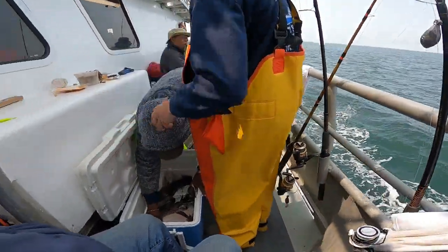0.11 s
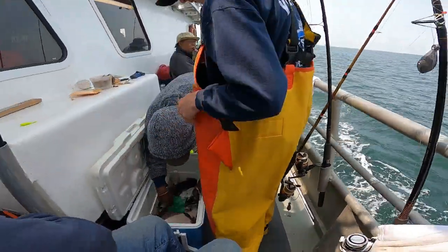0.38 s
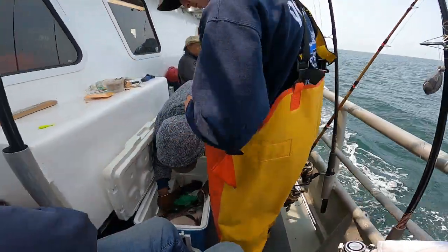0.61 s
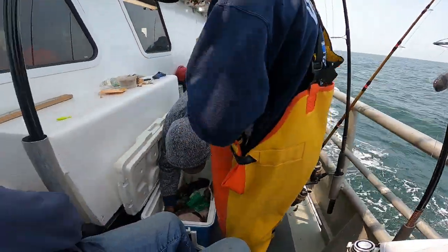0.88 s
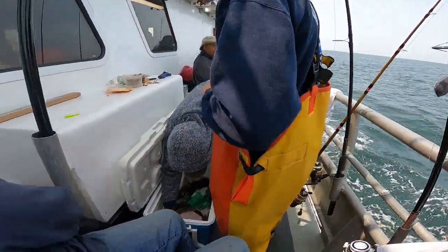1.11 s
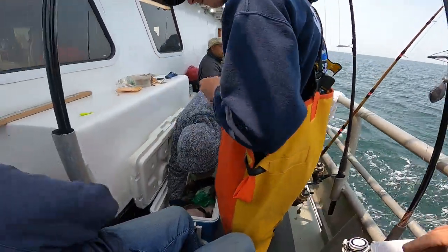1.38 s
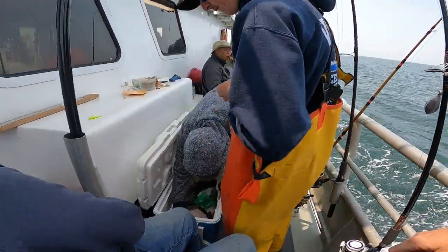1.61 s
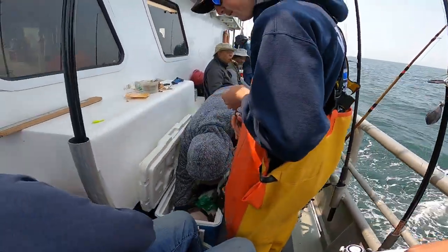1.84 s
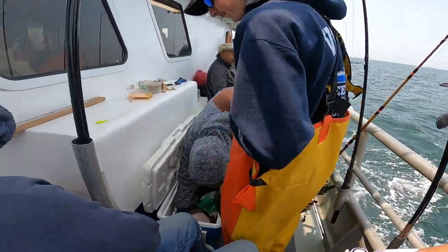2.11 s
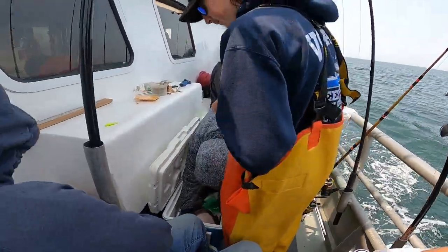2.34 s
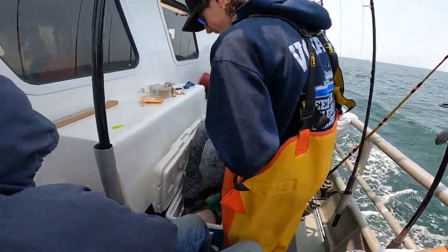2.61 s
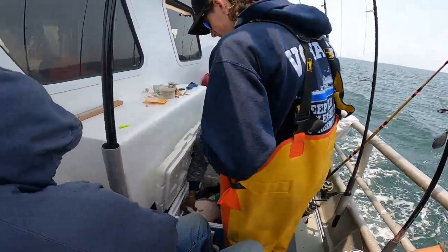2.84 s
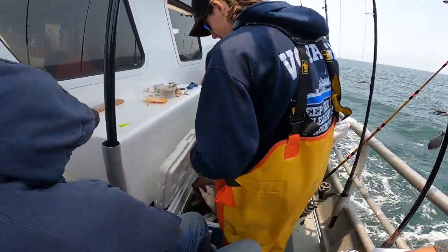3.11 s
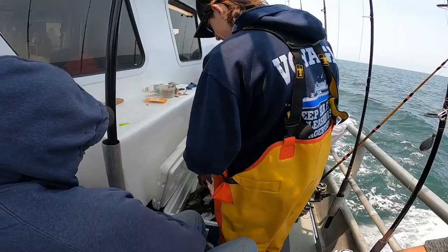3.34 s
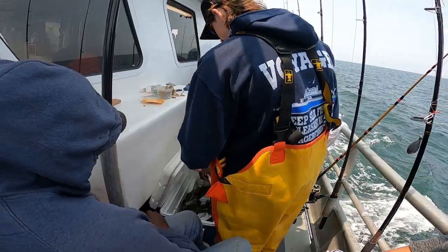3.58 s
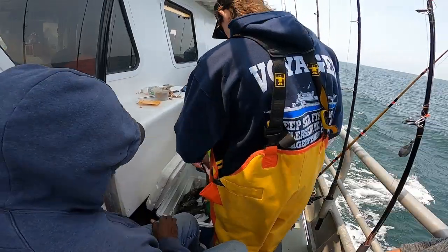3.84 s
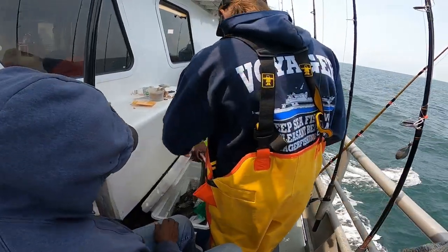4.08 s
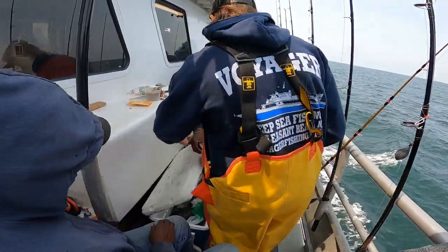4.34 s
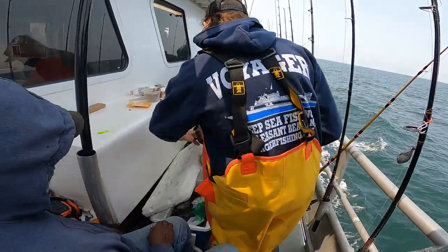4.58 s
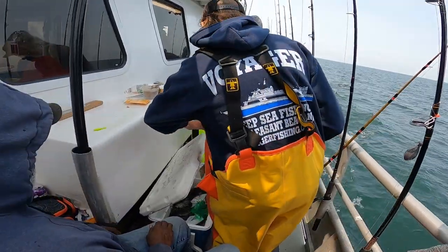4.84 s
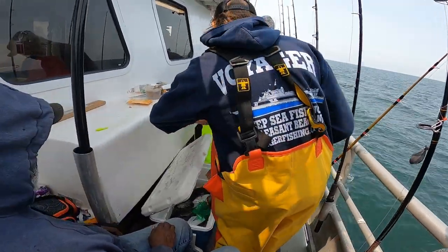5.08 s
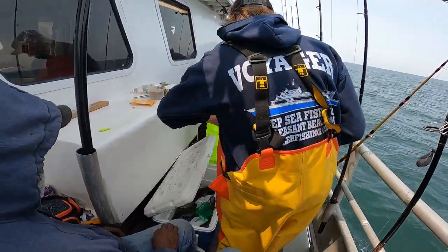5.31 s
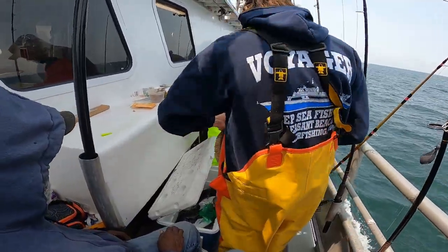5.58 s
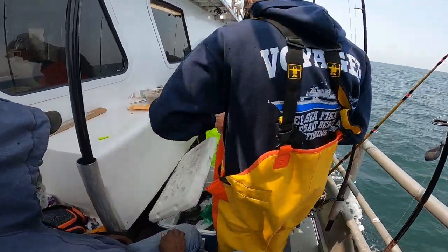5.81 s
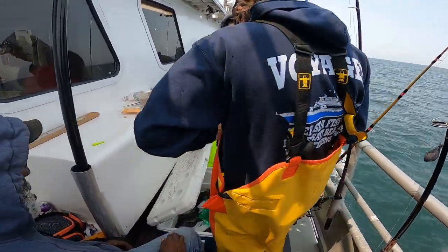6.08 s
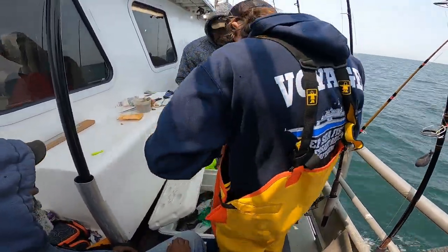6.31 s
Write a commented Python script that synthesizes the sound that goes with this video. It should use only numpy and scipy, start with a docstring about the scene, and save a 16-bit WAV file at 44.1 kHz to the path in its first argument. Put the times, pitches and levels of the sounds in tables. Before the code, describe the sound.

On the open deck of a moving boat, a deep diesel drone with a broad hull roar dominates. It holds steady for two seconds, then rises a few semitones and roughens, louder near the end. Wind buffets a small stereo camera microphone unevenly left and right. Wake hisses in soft swells. Faint metal clinks, a short cloth rustle and dull box knocks come mid-way, with another knock at the very end.

```python
"""Diesel under a boat's deck

On deck, above a six-cylinder diesel that gains speed: a deep firing tone and weaker crank orders are sines,
the exhaust's bark is a looped pulse, and a neighbouring tone and a second machine's hum are more sines.
Filtered noise makes the hull's roar, the wind on the microphone, the hissing wake and the rustling oilskin.
Near a small camera's two ports, tackle clinks and knocks as decaying modes; a whistle scrapes upward.
"""
import sys
import numpy as np
from scipy import signal
from scipy.fft import rfft, irfft, next_fast_len
from scipy.io import wavfile
from scipy.ndimage import uniform_filter1d, map_coordinates

SR = 44100
rng = np.random.default_rng(int(sys.argv[2]) if len(sys.argv) > 2 else 0)


def amplitude_ratio(level_db):
    """Convert a level in decibels to the matching linear amplitude (field) ratio."""
    exponent = np.asarray(level_db, float) / 20
    return 10 ** exponent


def wav_record(signal):
    """Record a signal, one row per channel, as 16-bit PCM in the file named by sys.argv[1]."""
    frames = np.transpose(np.atleast_2d(signal))
    bounded = np.clip(frames, -1, 1)
    # unit amplitude maps onto the largest positive 16-bit level
    quanta = np.round(bounded * 32767).astype(np.int16)
    wavfile.write(sys.argv[1], SR, quanta)


N = 284004
TIME = np.arange(N) / SR  # s

# Firing rate of the diesel: (time [s], rate [Hz])
FIRING_RATE = [(0, 46.4), (2.1, 46.6), (2.62, 50.8), (3.0, 51.6), (3.3, 52.75), (4.1, 54.7), (4.45, 57.1),
               (4.8, 57.4), (5.1, 58.1), (6.44, 58.6)]
# How loud the deck carries the firing tone at each pitch: (frequency [Hz], level [dB])
FIRING_TONE = [(46.4, -17), (49, -17), (53.5, -16), (55, -19), (57, -22), (58.5, -21.5)]
# The same for the tone at 1.5 times the firing rate: (frequency [Hz], level [dB])
UPPER_TONE = [(69.7, -25.5), (73, -29), (78, -33), (82, -34), (85.5, -28.5), (87.4, -27), (87.75, -26),
              (87.9, -20.5)]
# Weaker crank orders: (order [sixths of the firing rate], level at low speed [dB], level at full speed [dB])
WEAK_ORDERS = [(12, -46, -36), (18, -48, -42), (21, -55, -42), (24, -47, -42), (26, -46, -56),
               (27, -54, -42), (30, -43, -43), (33, -56, -47), (34, -50, -56), (37, -56, -45),
               (38, -47, -56), (39, -52, -46), (40, -46, -56), (43, -56, -49), (44, -47, -54),
               (45, -47, -54), (48, -56, -47), (54, -50, -55), (57, -57, -50), (60, -52, -50)]
# Overtones of the exhaust pulses, relative: (multiple of half the firing rate [1], level [dB])
BARK = [(14, -58), (22, -56), (30, -63), (38, -62), (56, -65), (64, -72)]
# Neighbouring tone, perhaps a twin engine: (time [s], frequency [Hz])
TWIN_RATE = [(0, 53.8), (4.3, 54), (5.4, 54.2), (5.5, 55.3), (6.44, 55.6)]
# Lines of a second machine that keeps its speed: (frequency [Hz], level [dB])
HUM_LINES = [(40, -35), (80.2, -33), (120.3, -46), (161.6, -43), (321.5, -45), (484, -48)]
# Hull roar over time; the wake follows it: (time [s], level [dB])
ROAR_LEVEL = [(0, -25), (1.1, -26), (1.9, -27), (2.6, -26.5), (3.6, -27.5), (4.05, -27.5), (4.55, -23.5),
              (5.2, -24), (5.9, -21.5), (6.44, -22)]
# Colour of the roar before the panels, relative: (frequency [Hz], density [dB per Hz])
ROAR_COLOUR = [(25, 0), (42, -7), (60, 3), (90, 1), (130, -1), (196, -3.5), (242, -4), (400, -11.5),
               (580, -10), (740, -13.5), (1000, -13), (1250, -16), (1500, -16.5), (2000, -18), (2200, -20),
               (2500, -22), (2890, -25), (3830, -32.5), (5000, -36), (7000, -46.5), (10000, -80)]
# Hull panels rung by the roar:
# (frequency [Hz], width [Hz], strength at low speed [dB], strength at full speed [dB])
HULL_PANELS = [(240, 34, 1, 2), (325.4, 37, -1, 4), (479, 60, 4.5, -2), (665, 36, 1, -7.5), (910, 40, 2, 6),
               (1003, 80, 3.5, -4), (1144, 64, 6, 3.5), (1274, 60, 2.5, -3.5), (1742, 257, 2, 2),
               (2500, 130, 1.5, -2), (3230, 250, -9.5, 0.5), (3860, 140, 7, 6.5), (3980, 140, 4, 6)]
# Further change of the roar's colour from slow to fast: (frequency [Hz], change [dB])
FULL_SPEED_COLOUR = [(100, 0), (250, 0), (550, -1), (1050, -1), (1700, 1), (3000, 0), (5000, -0.5)]
# Likeness of left and right in roar, wake and cloth: (frequency [Hz], coherence [1])
LIKENESS = [(60, 0.89), (190, 0.96), (350, 1), (600, 0.89), (1070, 0.87), (2400, 0.88), (3400, 0.75),
            (4500, 0.67), (6000, 0.41), (8000, .2), (11000, 0.095)]
# Wind on the ports: (time [s], strength [dB], left minus right [dB])
GUSTS = [(0, -37, 2), (.1, -51, 1.5), (.4, -52.5, -1), (.5, -23.5, 17), (.62, -39.5, 3), (.8, -28.5, -3),
         (.95, -31, 3), (1.1, -34.5, 9), (1.22, -25, 4), (1.45, -26.5, 3), (1.6, -25, -7.5), (1.8, -27, 3),
         (1.87, -18, 1.5), (1.95, -29, 3.5), (2.15, -22.5, -6), (2.42, -25.5, 3), (2.55, -33.5, 9.5),
         (2.72, -31, 0.5), (3.05, -24, -4.5), (3.2, -18.5, -5), (3.4, -36, 1), (3.55, -27, 8),
         (3.7, -27, 3), (3.82, -31.5, -4), (3.9, -32, -10), (4.15, -30.5, -5), (4.3, -21.5, -2.5),
         (4.55, -21, -8), (4.7, -23, -3), (5.1, -25, -6.5), (5.25, -27.5, -3), (5.4, -24.5, 3.5),
         (5.65, -34.5, 11.5), (5.9, -24, 0.5), (6.1, -23.5, -3.5), (6.3, -33.5, -5), (6.44, -30.5, 0)]
# Colour of the low wind rumble, relative: (frequency [Hz], density [dB per Hz])
RUMBLE_COLOUR = [(7, -22.5), (15, -4.5), (25, 1), (38, 0.5), (60, 0.5), (90, -3.5), (140, -24),
                 (300, -44.5), (600, -78.5)]
# Colour of the wind flutter, which rises and falls more with the gusts: (frequency [Hz], density [dB per Hz])
FLUTTER_COLOUR = [(30, -33.5), (70, -4), (108, -2), (200, -12), (400, -24.5), (700, -42), (1200, -74)]
# Colour of the wake's hiss, relative: (frequency [Hz], density [dB per Hz])
WAKE_COLOUR = [(2000, -19.5), (3500, 2), (5000, -6), (6500, -6), (8000, -11.5), (10000, -17.5),
               (12500, -30.5), (14500, -29.5), (16000, -63)]
# Swells of the wake: (time [s], rise [dB], width [s])
SPLASHES = [(.3, 5, 0.21), (1.17, 2, 0.086), (2.4, 4.5, 0.24), (3.05, 1.5, 0.12)]
# Dull knocks on a box:
# (time [s], strength [dB], main mode [Hz], second mode over main [1], decay by 60 dB [s])
KNOCKS = [(1.43, -36, 2350, 1.19, .07), (1.485, -31, 2380, 1.26, .07), (2.6245, -13, 495, .62, .06),
          (2.63, -17, 425, .7, .09), (2.922, -19, 310, .8, .1), (2.95, -20, 290, .75, .1),
          (6.398, -19, 340, .62, .3), (6.424, -17, 205, 1.6, .16)]
# Clinks, each favouring modes near one pitch:
# (time [s], strength [dB], left minus right [dB], favoured frequency [Hz])
CLINKS = [(1.7603, -40, -0.5, 5800), (1.7622, -43, 3, 11700), (1.7638, -44, 0, 4600),
          (1.7668, -43, 0, 7100), (1.784, -55, 1, 8100), (1.874, -53, -6.5, 8100), (1.9113, -48, -4, 5500),
          (1.914, -53, -4, 9900), (2.2235, -54, 2, 10500), (2.48, -63, -2.5, 10000)]
# Modes of the metal tackle: (frequency [Hz], relative level [dB], decay by 60 dB [s])
TACKLE_MODES = [(4590, 7.5, 0.03), (5500, 6, 0.047), (6220, 1, 0.045), (7160, 5.5, 0.031),
                (8100, -10, 0.17), (9211, -1.5, 0.073), (9905, -5, 0.08), (11900, -2, 0.065),
                (12340, -9, .05), (13700, -27, .05), (14770, -24, .045), (15150, -21, .1)]
# A tiny piece that rings alone: (time [s], strength [dB])
TINKS = [(2.985, -60), (3.843, -59), (6.375, -64)]
# Oilskin folds: (time [s], peak level [dB], fade [dB/s])
FOLDS = [(2.22, -51, 57), (2.632, -67.5, 502)]
# Colour of the cloth's rustle, relative: (frequency [Hz], density [dB per Hz])
CLOTH_COLOUR = [(3000, -43), (5000, 0.5), (7000, -4), (10000, -15), (13000, -21), (16000, -45.5)]
# Level lean between the ports: (frequency [Hz], left minus right [dB])
PORT_LEAN = [(60, 0.7), (360, -0.5), (880, 1.5), (2160, 1.5), (3400, 3.5), (6000, 0), (10000, -1.5)]
# Phase by which the right port leads: (frequency [Hz], lead [rad])
PORT_LEAD = [(100, 0), (1400, .3), (2400, .55), (3500, .75), (6500, .95), (8000, 1.3), (10000, 1.3),
             (13000, 1.1)]


def unit(x):
    """Scale to rms 1."""
    return x / np.sqrt(np.mean(x ** 2) + 1e-20)


def along(points, hz):
    """Read (frequency, value) points on a log frequency axis."""
    f, v = np.transpose(points)
    return np.interp(np.log(hz + 1), np.log(f + 1), v)


def curves(rows):
    """One value per sample for each column after the time."""
    s, *columns = np.transpose(rows)
    return [np.interp(TIME, s, column) for column in columns]


def wobble(rate):
    """A smooth random curve, rate knots a second."""
    knots = rng.standard_normal(int(N * rate / SR) + 4)
    return map_coordinates(knots, [np.arange(N) * rate / SR])


def filtered(x, response):
    """Multiply the spectrum of x by a complex response of frequency."""
    m = next_fast_len(N + SR // 2)
    return irfft(rfft(x, m) * response(np.fft.rfftfreq(m, 1 / SR)), m)[..., :N]


def rush(colour, likeness, patchy_db):
    """Stereo noise of rms 1 with random louder and softer patches; mid and side shares set the likeness."""
    z = signal.stft(rng.standard_normal((2, N)), nperseg=512)[2]
    patches = uniform_filter1d(rng.standard_normal(z.shape[1:]), size=6, axis=0)
    patches = uniform_filter1d(patches, size=14, axis=1)
    pair = signal.istft(z * amplitude_ratio(patchy_db * unit(patches)), nperseg=512)[1][:, :N]

    def mid_side_gain(hz):
        angle = np.arccos(np.clip(along(likeness, hz), -1, 1)) / 2
        return colour(hz) * np.array([np.cos(angle), np.sin(angle)])

    mid, side = filtered(pair, mid_side_gain)
    return unit(np.array([mid + side, mid - side]))


def tone(cycles, db, start=None):
    """A sine of rms level db, at a random starting phase unless given."""
    start = rng.random() if start is None else start
    return np.sqrt(2) * amplitude_ratio(db) * np.sin(2 * np.pi * (cycles + start))


def ring(hz, db, t60, attack):
    """One struck mode: a sine with a quick rise and exponential decay."""
    t = np.arange(SR // 4) / SR
    return amplitude_ratio(db - 60 * t / t60) * (1 - np.exp(-t / attack)) * np.sin(2 * np.pi * hz * t)


def add(track, s, sound):
    """Mix a sound in at time s."""
    start = round(s * SR)
    track[..., start:start + sound.shape[-1]] += sound


def swells(rows):
    """Bell-shaped rises in dB."""
    return sum(db * np.exp(-((TIME - s) / width) ** 2) for s, db, width in rows)


def speed_share(rate_hz):
    """Speed from 0 at the slowest to 1 at the fastest."""
    return (rate_hz - rate_hz.min()) / np.ptp(rate_hz)


def bark(firings, count=3):
    """Exhaust-pulse overtones locked to the crank; the pulse shape drifts between a few random ones."""
    order = np.arange(BARK[0][0], BARK[-1][0])
    draw = rng.standard_normal((count, len(order), 2))
    stronger_db = 3 * (order % 2 == 0)  # whole multiples of the firing rate stand out
    lines = np.zeros((count, 4097), complex)
    lines[:, order] = amplitude_ratio(along(BARK, order) + stronger_db) * (draw[..., 0] + 1j * draw[..., 1])
    shapes = irfft(lines, axis=1) * 4096
    place = firings / 2 % 1 * 8192  # one turn of the shape lasts two firings
    out = 0
    for shape in shapes:
        drift = amplitude_ratio(3 * wobble(2) - 6)
        out = out + drift * np.interp(place, np.arange(8192), shape, period=8192)
    return out


def engine():
    """Six firings a cycle; unequal cylinders leave tones at sixths of the firing rate."""
    rate_hz, = curves(FIRING_RATE)
    firings = np.cumsum(rate_hz) / SR + rng.random()
    tones = tone(firings, along(FIRING_TONE, rate_hz) + 0.26 * wobble(3.0), start=0)
    tones = tones + tone(3 * firings / 2, along(UPPER_TONE, 3 * rate_hz / 2) + 1.3 * wobble(4))
    share = speed_share(rate_hz)
    for sixths, slow_db, fast_db in WEAK_ORDERS:
        level_db = slow_db + share * (fast_db - slow_db) + 2.5 * wobble(2)
        tones = tones + tone(sixths * firings / 6, level_db)
    effort_db = 0.25 * (rate_hz - rate_hz[0])  # the bark grows with speed
    return tones + amplitude_ratio(effort_db) * bark(firings), firings


def twin(firings):
    """Its slip against the firing tone makes the bass pulse: fast and shallow at first, slower and deeper later."""
    cycles = np.cumsum(curves(TWIN_RATE)[0]) / SR
    at = round(5.2 * SR)  # here twin and firing tone are in opposition
    level_db = -32 + 0.8 * TIME + 0.87 * wobble(2.2)
    main = tone(cycles, level_db, start=firings[at] - cycles[at] + 0.5)
    upper = tone(3 * cycles / 2, level_db - 6 + 1.5 * wobble(3))
    return main + upper


def second_machine():
    """A steady-pitched hum near the engine's low tones; its lines waver in strength."""
    return sum(tone(hz * TIME, db + 2.5 * wobble(2.5)) for hz, db in HUM_LINES)


def engine_room(x):
    """Many short echoes below deck make the colour ragged."""
    t = np.arange(SR // 4) / SR
    echoes = rng.standard_normal(len(t)) * amplitude_ratio(-60 * t / 0.2)
    echoes *= amplitude_ratio(-15) / np.linalg.norm(echoes)
    echoes[0] = 1  # the direct sound
    return signal.fftconvolve(x, echoes[None], axes=1)[:, :N]


def panels(hz, column):
    """Gain of the hull's resonant panels, whose strengths stand in the given column."""
    power = 1
    for row in HULL_PANELS:
        power = power + amplitude_ratio(2 * row[column]) / (1 + (2 * (hz - row[0]) / row[1]) ** 2)
    return np.sqrt(power)


def roar(level_db, firings):
    """Exhaust and engine-room noise through the hull, faintly throbbing; speed changes which panels ring."""
    noise = rush(lambda hz: amplitude_ratio(along(ROAR_COLOUR, hz)) * panels(hz, column=2), LIKENESS, patchy_db=0.62)
    slow = unit(engine_room(noise))

    def speed_up(hz):
        return amplitude_ratio(along(FULL_SPEED_COLOUR, hz)) * panels(hz, column=3) / panels(hz, column=2)

    fast = filtered(slow, speed_up)
    share = speed_share(curves(FIRING_RATE)[0])
    throb_db = 0.27 * np.cos(2 * np.pi * firings) + 0.29 * np.cos(np.pi * firings)
    return amplitude_ratio(level_db + throb_db + 0.15 * wobble(9.1)) * ((1 - share) * slow + share * fast)


def wind():
    """Eddies buffet each microphone port on its own, now more on one side, now on the other."""
    gust_db, pan_db = curves(GUSTS)
    port_db = np.array([pan_db, -pan_db]) / 2 + 2.0 * np.array([wobble(22), wobble(22)])
    rumble_db = -24 + 0.42 * (gust_db - gust_db.mean() + port_db)  # 0.42 dB per dB of gust
    flutter_db = gust_db + port_db - 2.5
    rumble = rush(lambda hz: amplitude_ratio(along(RUMBLE_COLOUR, hz)), [(50, 0.11)], patchy_db=1.0)
    flutter = rush(lambda hz: amplitude_ratio(along(FLUTTER_COLOUR, hz)), [(50, 0.046)], patchy_db=1.5)
    return amplitude_ratio(rumble_db) * rumble + amplitude_ratio(flutter_db) * flutter


def wake(load_db):
    """Foam along the side hisses in short swells, louder as the roar grows."""
    level_db = -54 + 1.16 * load_db + swells(SPLASHES)  # 1.16 dB per dB of roar
    level_db = level_db + 1.3 * wobble(8.2) + 0.58 * wobble(27)
    return amplitude_ratio(level_db) * rush(lambda hz: amplitude_ratio(along(WAKE_COLOUR, hz)), LIKENESS, patchy_db=1.0)


def knock(db, hz, ratio, t60):
    """A box struck dully: three short modes over a soft tap of low-passed noise."""
    t = np.arange(SR // 4) / SR
    low_pass = signal.butter(3, 2.5 * hz, fs=SR, output="sos")
    noise = signal.sosfilt(low_pass, rng.standard_normal(len(t)))
    tap = amplitude_ratio(db - 13 - 60 * t / 0.04) * (1 - np.exp(-t / 0.003)) * noise
    modes = ring(hz, db, t60, 0.004)
    modes = modes + ring(ratio * hz, db - 6, 2.2 * t60, 0.004)
    modes = modes + ring(1.85 * hz, db - 11, t60, 0.004)
    return (modes + tap) * amplitude_ratio([[-2], [2]])  # stronger on the right


def clink(db, pan_db, favoured_hz):
    """A metal contact rings the tackle's modes at new strengths and pitches over a dry noise rattle."""
    t = np.arange(SR // 4) / SR
    sound = 0
    for hz, level, t60 in TACKLE_MODES:
        strength, detune = rng.standard_normal(2)
        octaves_off = abs(np.log2(hz / favoured_hz))
        mode_db = db + level - 15 * octaves_off + 2 * strength
        sound = sound + ring(hz * (1 + 0.01 * detune), mode_db, t60, 0.0005)
    band = signal.butter(4, [4200, 12800], "band", fs=SR, output="sos")
    hiss = signal.sosfilt(band, rng.standard_normal((2, len(t))))
    rattle = amplitude_ratio(db - 5 - 60 * t / 0.035) * (1 - np.exp(-t / 0.0003)) * hiss
    return (sound + rattle) * amplitude_ratio([[pan_db / 2], [-pan_db / 2]])


def tackle():
    """Knocks, clinks and the single-mode tinks of a tiny piece, each at its time."""
    out = np.zeros((2, N + SR))
    for s, db, hz, ratio, t60 in KNOCKS:
        add(out, s, knock(db, hz, ratio, t60))
    for s, db, pan_db, favoured_hz in CLINKS:
        add(out, s, clink(db, pan_db, favoured_hz))
    for s, db in TINKS:
        add(out, s, ring(8110, db, t60=0.4, attack=0.0035))
    return out[:, :N]


def rustle():
    """Stiff waterproof cloth crackles as it folds: patchy noise that rises and fades at steady dB rates."""
    folds = 0
    for s, db, fade_db in FOLDS:
        folds = folds + amplitude_ratio(db - np.maximum(139 * (s - TIME), fade_db * (TIME - s)))  # rises 139 dB/s
    cloth = rush(lambda hz: amplitude_ratio(along(CLOTH_COLOUR, hz)), LIKENESS, patchy_db=2.2)
    return folds * amplitude_ratio(1.5 * wobble(60)) * cloth


def scrape():
    """A thin whistle, a narrow band of noise, swells and fades and slides up to a held pitch."""
    peak_s, width_s = 3.65, 0.07
    hz = 7250 - 3500 * np.clip(3.65 - TIME, 0, 1)  # slides 3500 Hz/s, held from 3.65 s
    swell = np.exp(-((TIME - peak_s) / width_s) ** 2 / 2)
    return swell * tone(np.cumsum(hz) / SR, -62.5) * unit(wobble(700))


def scene():
    """Everything heard on deck: machines below, wind and water around, gear near the microphone."""
    tones, firings = engine()
    roar_db, = curves(ROAR_LEVEL)
    load_db = roar_db - roar_db.mean()
    machines = tones + twin(firings) + second_machine() + roar(roar_db, firings)
    return machines + wind() + wake(load_db) + tackle() + rustle() + scrape()


def band_limit(x):
    """A steep low-pass at the top of the band."""
    return signal.sosfilt(signal.butter(12, 15200, fs=SR, output="sos"), x)


def record(dry):
    """Two close microphone ports with a slight lag and lean between them, and a soft ceiling on the peaks."""
    side = np.array([[1], [-1]])

    def port_response(hz):
        lean = amplitude_ratio(side * along(PORT_LEAN, hz) / 2)
        return lean * np.exp(-0.5j * along(PORT_LEAD, hz) * side)

    ports = filtered(dry, port_response)
    ceiling, knee = 0.51, 4.5  # a higher knee bends more sharply
    mix = ports / (1 + np.abs(ports / ceiling) ** knee) ** (1 / knee)
    return band_limit(mix)


dry = scene()
out = record(dry)
wav_record(out)
```